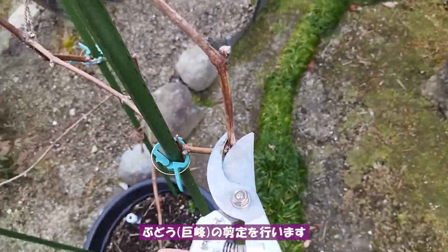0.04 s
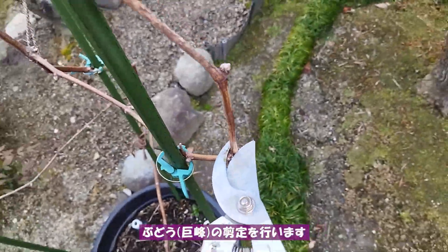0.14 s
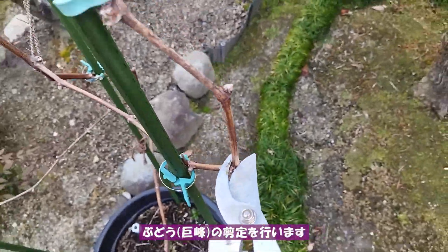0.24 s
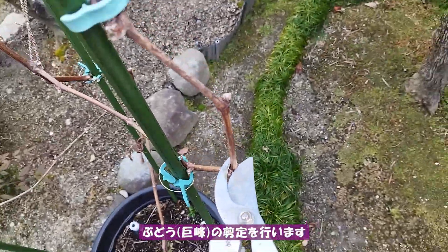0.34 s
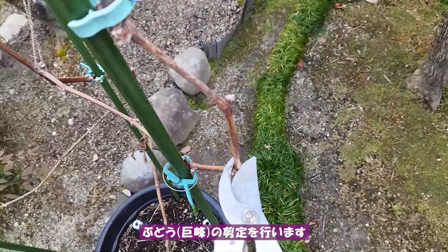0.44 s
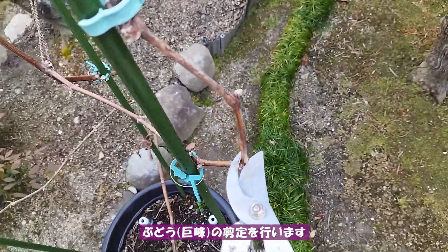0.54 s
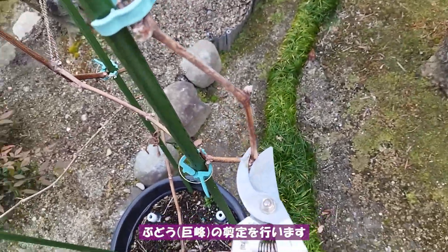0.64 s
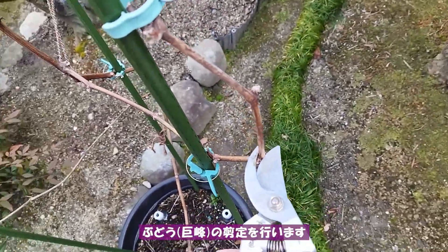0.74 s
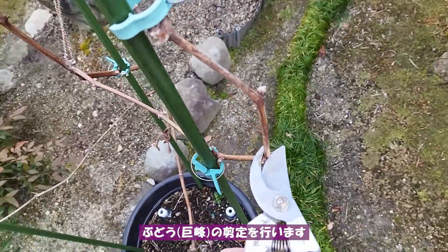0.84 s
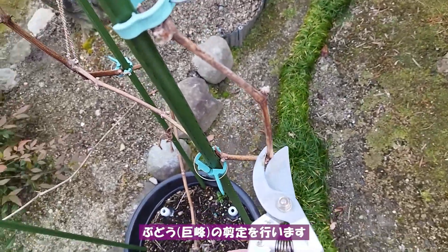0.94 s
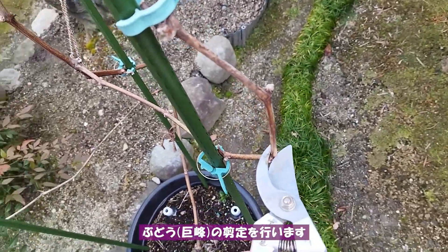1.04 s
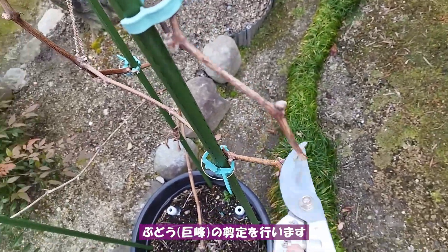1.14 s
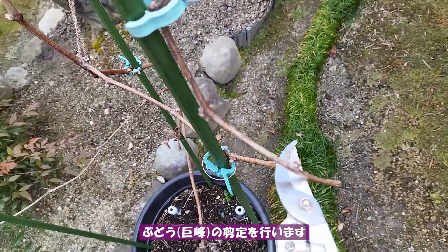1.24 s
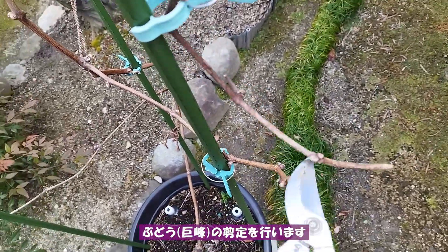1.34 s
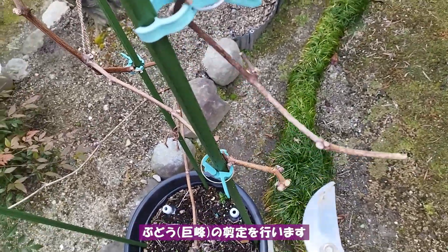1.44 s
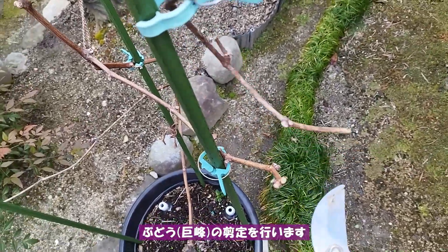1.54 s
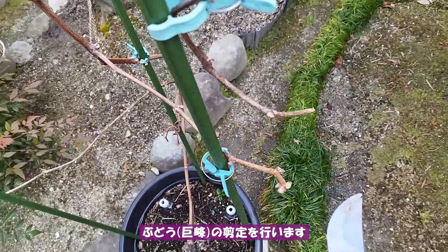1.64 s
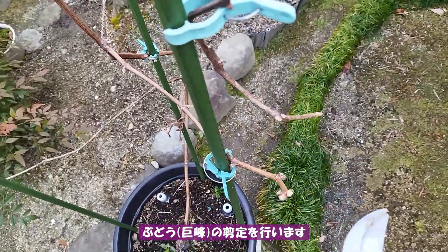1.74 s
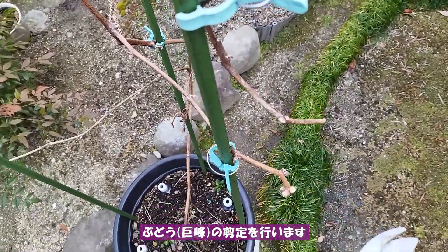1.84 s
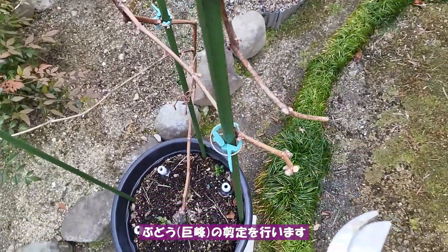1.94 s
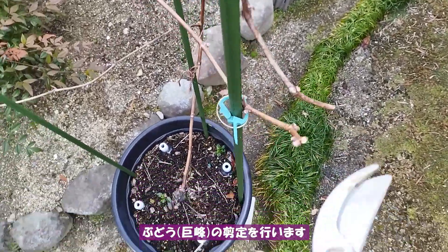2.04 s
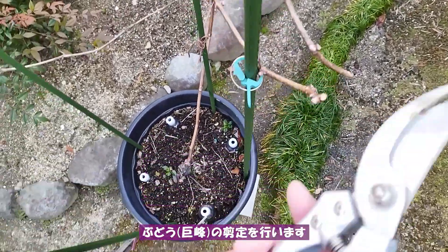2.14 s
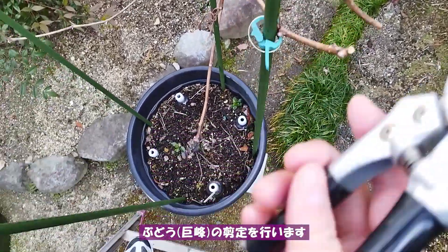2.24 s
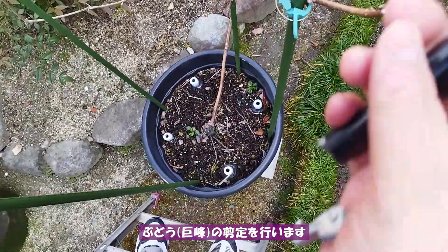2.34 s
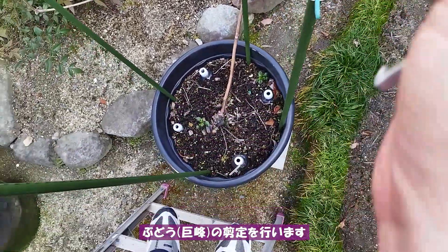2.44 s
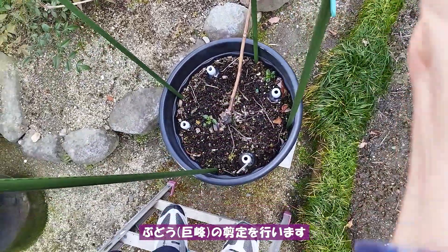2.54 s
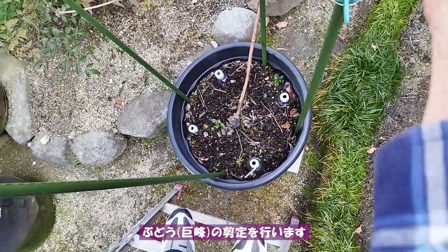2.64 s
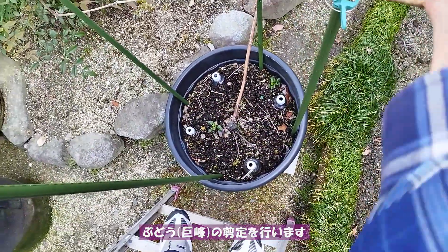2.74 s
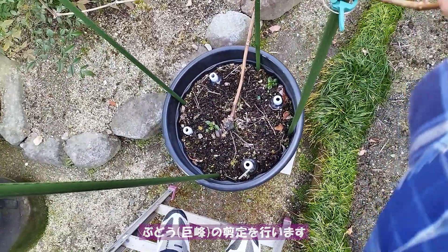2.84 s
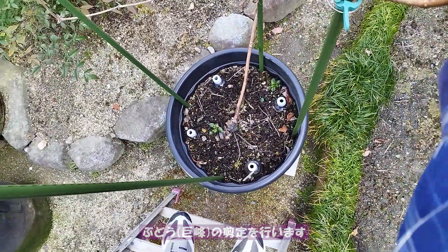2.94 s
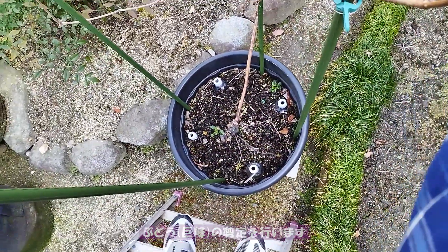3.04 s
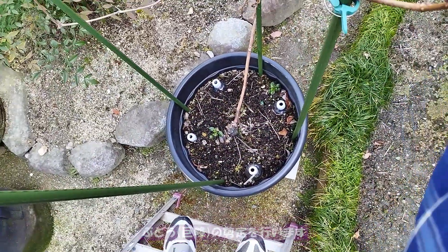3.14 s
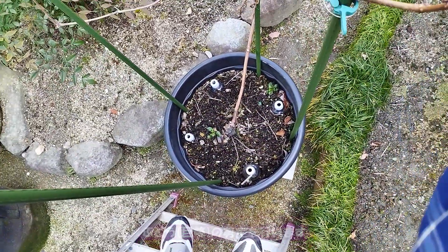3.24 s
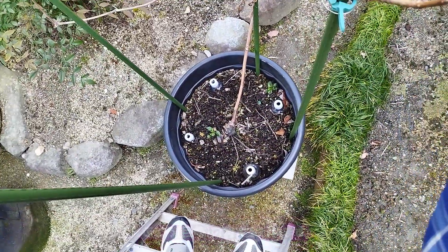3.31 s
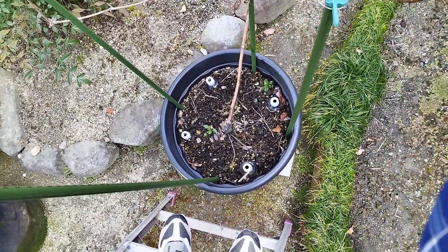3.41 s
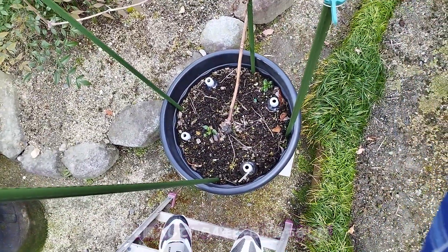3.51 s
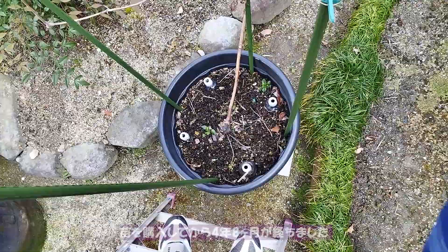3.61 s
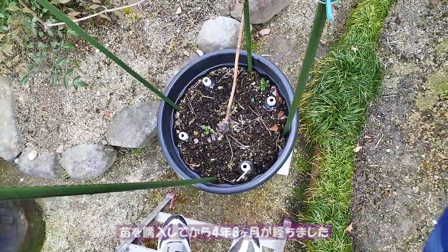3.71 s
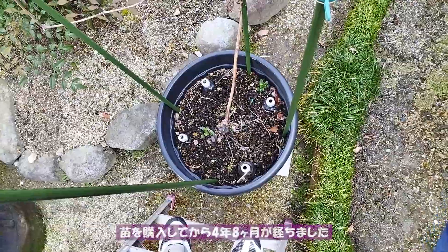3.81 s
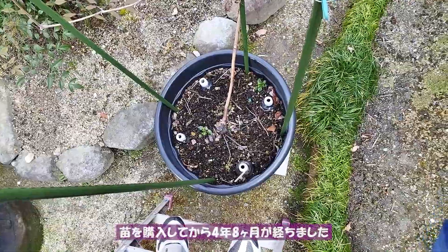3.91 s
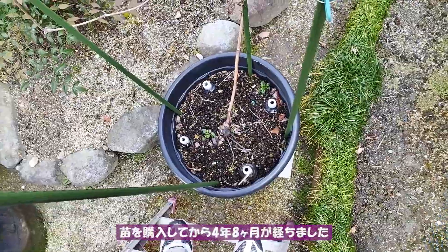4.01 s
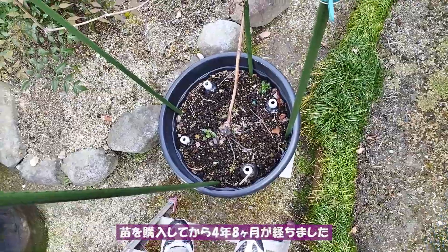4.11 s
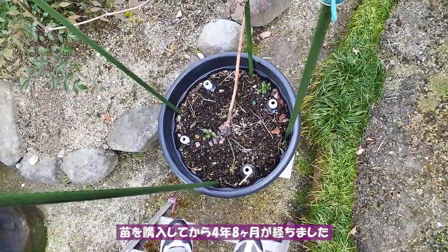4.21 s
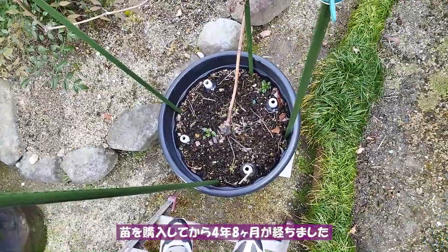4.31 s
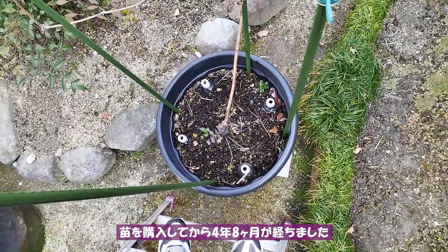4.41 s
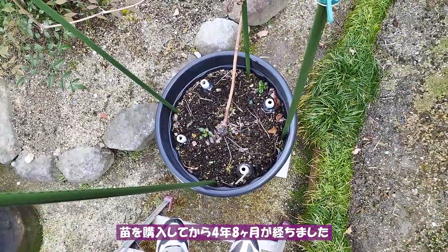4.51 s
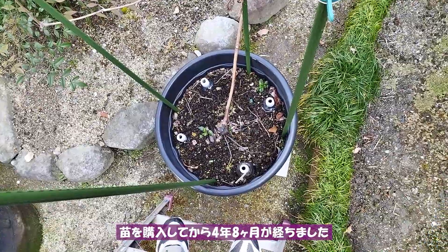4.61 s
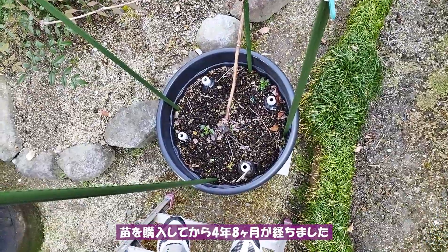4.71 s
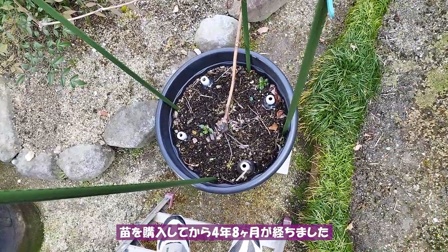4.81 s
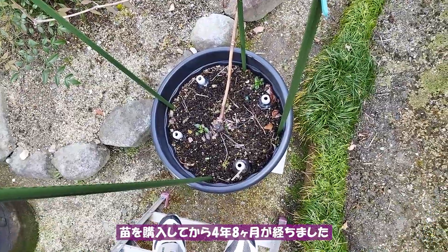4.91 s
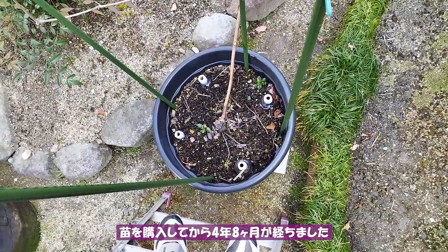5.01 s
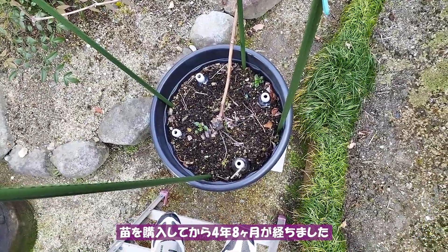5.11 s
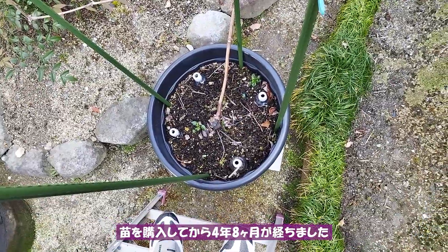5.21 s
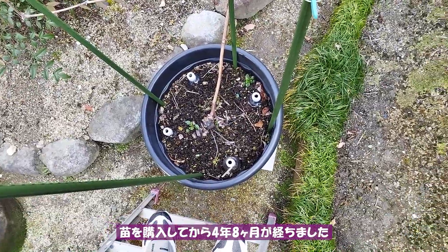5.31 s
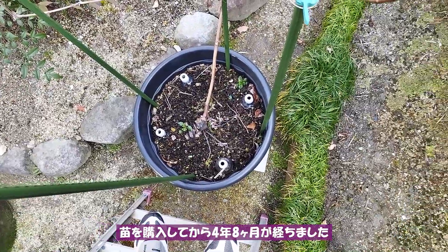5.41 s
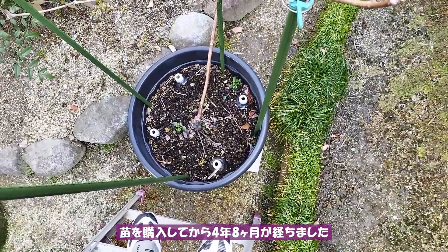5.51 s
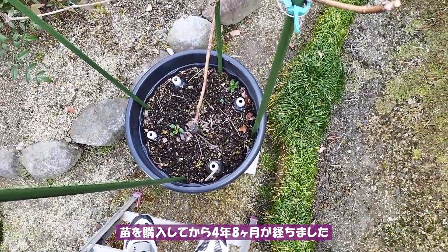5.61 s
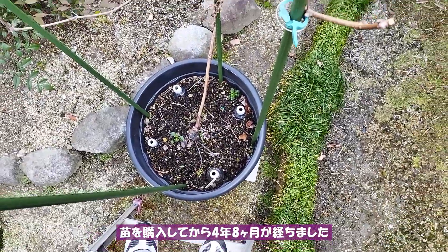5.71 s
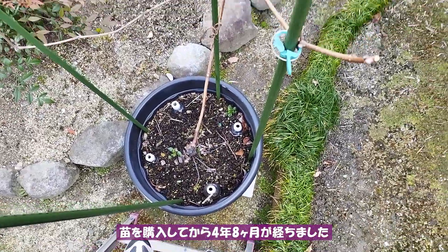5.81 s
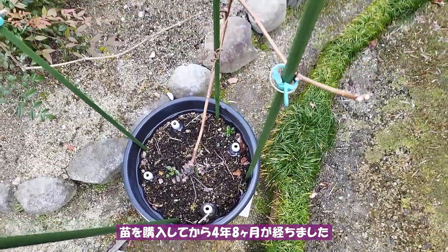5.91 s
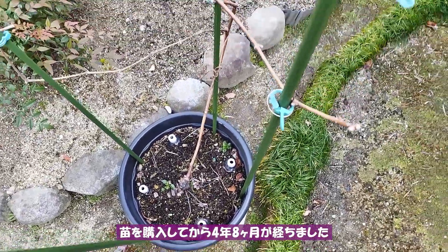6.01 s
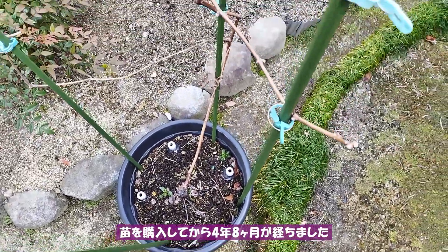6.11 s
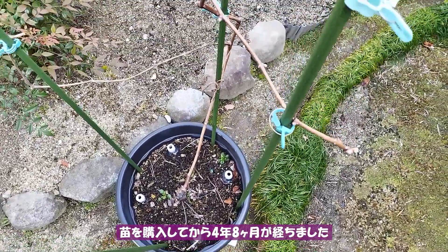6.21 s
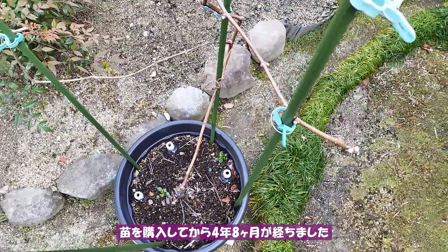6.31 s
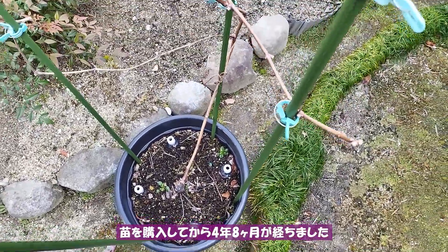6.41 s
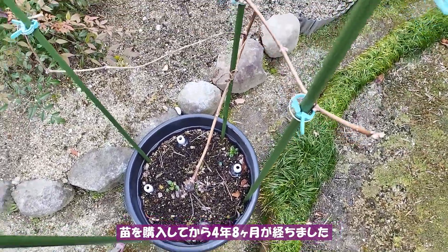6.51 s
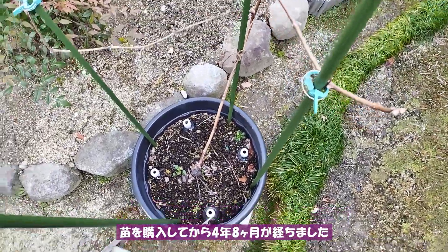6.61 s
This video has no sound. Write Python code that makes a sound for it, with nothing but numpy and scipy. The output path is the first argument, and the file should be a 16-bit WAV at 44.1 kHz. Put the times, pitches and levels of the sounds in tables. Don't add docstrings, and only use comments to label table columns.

```python
import sys
import numpy as np
from scipy import signal
from scipy.fft import rfft, irfft, next_fast_len
from scipy.io import wavfile
from scipy.ndimage import uniform_filter1d

SR = 44100
rng = np.random.default_rng(int(sys.argv[2]) if len(sys.argv) > 2 else 0)


def store_wav(level_fs):
    pcm = np.round(np.clip(np.atleast_2d(level_fs), -1, 1) * 32767)
    wavfile.write(sys.argv[1], SR, pcm.T.astype(np.int16))


def invert_db(level):
    return 10 ** (np.asarray(level, dtype=float) / 20)


N = 293529
CUT_LAG, LAG, HAND_DROP_S = 10, 13, 2.5


def evened(x):
    return x / np.sqrt(np.mean(x ** 2) + 1e-20)


def read(points, hz):
    f, value = np.transpose(points)
    return np.interp(np.log(hz + 1), np.log(f + 1), value)


def column(rows, index, t):
    return np.interp(t, np.array(rows)[:, 0], np.array(rows)[:, index])


def hiss(shape_db, same, size):
    hop = size // 4
    frames, hz = N // hop + 5, np.fft.rfftfreq(size, 1 / SR)
    a, b, c, d = rng.standard_normal((frames, len(hz), 4)).T
    same = np.clip(same(hz), -1, 1)[:, None]
    left, other = a + 1j * b, c + 1j * d
    z = np.array([left, same * left + np.sqrt(1 - same ** 2) * other])
    z *= invert_db(shape_db(hz[:, None], np.arange(frames) * hop / SR))
    return signal.istft(z, nperseg=size, noverlap=size - hop)[1][:, :N]


# frequency in Hz, density in dB per Hz.
AIR_SPECTRUM = [(15, -28.5), (25, -5.5), (60, -4.5), (108, -13.5), (146, -14.5), (182, -19), (259, -15),
                (422, -21), (524, -18), (1120, -23.5), (1600, -26.5), (3510, -41), (7400, -51), (8300, -58),
                (10500, -53.5), (14800, -44), (16500, -58)]
# frequency in Hz, left-right likeness from -1 to 1.
PORT_LIKENESS = [(60, 0.89), (150, 0.88), (380, 0.71), (950, -0.19), (2380, -0.14), (5980, 0.02),
                 (15000, -0.45)]


def air():
    wash = hiss(lambda hz, t: read(AIR_SPECTRUM, hz) + 0 * t, lambda hz: read(PORT_LIKENESS, hz), size=2048)
    return invert_db(-53.5) * evened(wash)


# time in seconds, level in dB.
TRAFFIC = [(0.0, -56), (0.35, -64.5), (1.0, -60), (1.3, -53.5), (1.7, -53.5), (2.2, -56), (2.9, -60),
           (3.5, -53), (4.04, -51), (4.46, -54.5), (4.85, -58), (5.24, -52.5), (5.6, -56), (6.2, -58.5),
           (6.66, -55.5)]
# centre in seconds, width in seconds, rise in dB.
GUSTS = [
    (0.05, 0.35, 13),
    (0.42, 0.032, 21),
    (1.2, 0.14, 11),
    (1.5, 0.11, 6),
    (3.4, 0.23, 6),
    (5.6, 0.056, 8.1),
    (6.4, 0.097, 5.3),
]


def rumble():
    t = np.arange(N) / SR
    drone_spectrum = [(70, -29.5), (120, 3.5), (290, 0.5), (400, -12.5), (700, -47.0)]
    wind_spectrum = [(12, -11), (25, -4.5), (60, -2.5), (100, -31)]
    drone = hiss(lambda hz, t: read(drone_spectrum, hz) + 0 * t, lambda hz: .93 + 0 * hz, size=2048)
    wind = hiss(lambda hz, t: read(wind_spectrum, hz) - hz / 10 + 0 * t, lambda hz: .55 + 0 * hz, size=4096)
    wind_db = -59.5 + sum(db * np.exp(-((t - s) / width) ** 2) for s, width, db in GUSTS)
    return invert_db(column(TRAFFIC, 1, t) - 2.0) * evened(drone) + invert_db(wind_db - 6) * evened(wind)


def ringing(modes, size=2048):
    t = np.arange(size) / SR
    h = 0
    for hz, width, db in modes:
        decay = np.exp(-np.pi * width * t)
        h = h + invert_db(db) * np.sqrt(width) * decay * np.sin(2 * np.pi * hz * t)
    return h / np.linalg.norm(h)


def steep(h, low_hz, high_hz):
    return signal.sosfilt(signal.butter(2, [low_hz, high_hz], "band", fs=SR, output="sos"), h)


# frequency in Hz, width in Hz, level in dB.
BODY_MODES = [(1750, 400, 2), (2050, 350, 4), (2600, 450, 9), (3255, 1200, 3)]
MIDDLE_MODES = [(6000, 1700, -9), (6820, 1200, -3), (7000, 2280, -2.5)]
TREBLE_MODES = [(9880, 1000, -12), (12500, 2200, -2.5), (14190, 2000, 3.5)]


def voices():
    body = steep(ringing(BODY_MODES), 1100, 3800)
    middle = steep(ringing(MIDDLE_MODES), 4600, 9000)
    return [body, middle, steep(ringing(TREBLE_MODES), 8000, 16500)]


def part(hz, spread, upper_db=-6):
    modes = [(0.9 * hz, spread * hz, -6), (hz, spread * hz, 0), (1.25 * hz, 2 * spread * hz, upper_db)]
    return steep(ringing(modes), 0.75 * hz, min(1.8 * hz, .45 * SR))


def grains(size):
    strength_db = 2.0 * np.minimum(rng.exponential(1, size), 5)
    g = rng.standard_normal((3, size)) * invert_db(strength_db)
    return evened(g[:2] + 0.34 * np.array([np.roll(g[2], LAG), g[2]]))


# frequency in Hz, width in Hz, level in dB.
CRACK_MODES = [(3328, 350, -4), (4170, 890, -2), (4740, 850, 1), (5800, 160, -9), (6430, 650, -5),
               (7460, 910, -24)]
# time in seconds, effort in dB, brightness in dB.
HAND_MOTION = [(0.0, -86, 1), (0.9, -78.5, -9), (1.1, -75, -8.5), (1.42, -63, -11.5), (1.6, -89, -5.5),
               (2.0, -80, -6), (2.3, -73, -3.5), (2.78, -66, -4.5), (2.95, -76.5, -1.5), (3.5, -77.5, 1.5),
               (3.85, -68, -11), (4.25, -72, -0.5), (4.55, -74, -2.5), (5.0, -67.5, -2), (5.12, -86, 0.5),
               (5.54, -64, -20.5), (5.8, -68, -6), (6.66, -68.5, -8.5)]


def rustle():
    t = np.arange(N) / SR
    effort, bright = column(HAND_MOTION, 1, t), column(HAND_MOTION, 2, t)
    after = np.maximum(t - 1.185, 0)
    bed = 0
    groups = zip(voices(), [0, 1, 1.25], [-69, -51, -52], [-40, -150, -140])
    for h, share, db, fall in groups:
        level = invert_db(effort + share * bright) + invert_db(db + fall * after) * (after > 0)
        rasp = grains(N)
        bed = bed + signal.oaconvolve(level * rasp, h[None])[:, :N]
    crackle = invert_db(-47.5 - 150 * after) * (after > 0) * rasp
    fibres = steep(ringing(CRACK_MODES[:3]), 2700, 5500)
    return bed + signal.oaconvolve(crackle, fibres[None])[:, :N]


# start in seconds, length in seconds, level in dB.
SQUEAKS = [
    (4.495, 0.074, -54),
    (4.56, 0.036, -58),
    (4.74, 0.066, -59),
    (4.8, 0.12, -61),
    (4.95, 0.08, -56),
    (5.061, 0.046, -45.5),
]


def spring_squeak():
    t, hz = np.arange(N) / SR, 3160
    squeak = evened(signal.oaconvolve(rng.standard_normal(N), ringing([(hz, 60, 0)]))[:N])
    squeak += invert_db(-3.5) * np.sin(2 * np.pi * hz * t + 4.4 * np.sin(2 * np.pi * 7 * t))
    level = 0
    for s, length, db in SQUEAKS:
        level = level + invert_db(db - 10.0) * np.clip(np.minimum(t - s, s + length - t) / 0.017, 0, 1)
    squeak *= level
    return np.array([np.roll(squeak, LAG), squeak])


def add(mix, s, sound):
    mix[:, round(s * SR):][:, :sound.shape[1]] += sound


# start and length in seconds, level in dB, body pitch in Hz.
BRUSHES = [(0.035, 0.035, -70, 2480), (1.128, 0.019, -59, 2300), (1.308, 0.034, -54.5, 1230),
           (1.564, 0.056, -69, 2510), (1.62, 0.072, -60, 2690), (1.849, 0.046, -64, 2600),
           (1.957, 0.083, -74.5, 2480), (3.077, 0.033, -69.5, 2800), (3.128, 0.064, -60.5, 2720),
           (3.365, 0.025, -69, 2600), (3.843, 0.033, -63.5, 2337), (4.013, 0.086, -66, 2960),
           (4.08, 0.12, -67, 2940), (4.439, 0.05, -70, 2470), (4.484, 0.13, -64, 2920),
           (4.76, 0.18, -67.5, 2900), (4.9, 0.11, -59.5, 2750), (5.019, 0.097, -58.5, 2910),
           (5.37, 0.052, -67, 2360), (5.638, 0.038, -70, 2390)]
# start and length in seconds, level in dB, body pitch in Hz.
SCUFFS = [(1.753, 0.014, -54, 2600), (1.798, 0.06, -51, 2680), (1.8, 0.04, -58, 3200),
          (1.805, 0.05, -57, 1980), (1.803, .025, -61, 6740), (1.815, 0.013, -51, 2500),
          (1.83, 0.0066, -54, 6660), (3.459, 0.021, -61, 2330), (3.696, 0.023, -66, 2820),
          (3.8, 0.16, -61, 1920), (3.82, 0.14, -61, 2490), (3.84, 0.043, -61.5, 2200),
          (4.05, 0.14, -68, 1990), (4.11, 0.067, -65.5, 7700), (4.618, 0.045, -62, 2200),
          (4.49, .11, -62, 2500), (4.76, .15, -65, 2300), (4.9, 0.27, -62, 2200), (6.085, 0.05, -55, 2450),
          (6.092, 0.011, -52, 2050)]


def rubs():
    out = np.zeros((2, N))
    flutter = invert_db(1.8 * evened(uniform_filter1d(rng.standard_normal(N), size=200)))
    rasp = np.array([grains(N) for _ in range(3)]) * flutter
    upper = voices()[1:]
    for strokes, colour_db, pan_db in [(BRUSHES, [-2, -1, 0], 0), (SCUFFS, [-1, -27, -19], 7)]:
        pan = invert_db(pan_db * np.array([[.5], [-.5]]))
        for s, length, db, hz in strokes:
            at = round(s * SR)
            stroke = signal.windows.tukey(round(length * SR), .6)
            level = invert_db(db + np.array(colour_db))[:, None, None] * pan
            drive = level * stroke * rasp[:, :, at:at + len(stroke)]
            responses = np.array([part(hz, 0.079, upper_db=-15), *upper])[:, None]
            add(out, s, signal.fftconvolve(drive, responses, axes=2).sum(0))
    return out


def scrape(ms, noise, drag_db):
    t = np.arange(noise.shape[-1]) / SR
    onset = 1 - np.exp(-t / .0001)
    shape = onset * (np.exp(-t / (max(ms, .1) / 1000)) + invert_db(drag_db) * np.exp(-t / 0.011))
    both = shape * (noise[:, :1] + .65 * noise[:, 1:])
    return both / np.linalg.norm(both, axis=2, keepdims=True)


# time in seconds, edge in dB,
# middle in dB, body in dB, body pitch in Hz.
CLICKS = [(0.9633, -32.5, -58, -39.5, 2230), (0.9843, -40, -47, -59, 4120), (0.9916, -40, -46, -65, 1260),
          (1.053, -35.5, -43.5, -45, 2290), (1.1153, -38, -44, -43.5, 2600), (1.315, -36, -43, -42, 1150),
          (3.1347, -47, -53, -64, 2600), (3.1984, -52, -66, -69, 1140), (3.2237, -43, -56, -72, 2270),
          (3.231, -29, -35.5, -54, 2290), (3.4074, -55.5, -66, -70, 1860), (4.0427, -53, -55, -59, 2380),
          (4.2589, -27.5, -37, -36, 3380), (4.2592, -49.5, -60, -38, 7960),
          (4.698, -47.5, -59.5, -67.5, 1370), (4.7457, -31, -36.5, -44, 3130),
          (4.7578, -36, -46, -64, 3240), (4.7635, -41, -51, -60, 3160), (4.775, -40, -50, -63, 3120),
          (5.019, -53, -56, -55, 5000), (6.145, -55, -68, -66, 1750)]
# time in seconds, edge in dB, middle in dB,
# body in dB, body pitch in Hz.
TWIGS = [(0.6911, -58, -58.5, -57.5, 3830), (1.262, -58, -62, -61, 2480), (1.2986, -42, -50, -50, 2840),
         (1.3256, -41, -43, -36.5, 1630), (1.3544, -51, -51, -48, 1310), (1.3664, -50, -49, -46, 1170),
         (1.3874, -43, -42, -43.5, 2560), (1.4018, -51, -53, -51, 1407), (1.453, -60, -54, -55.5, 3630),
         (1.8333, -55, -47, -49, 2600), (3.2363, -27, -34, -54.5, 2600), (3.2436, -44, -45, -51, 2600),
         (3.2485, -33, -36, -48.5, 2084), (3.7578, -51, -51, -51, 2035), (3.9516, -47.5, -45, -44.5, 3080),
         (4.003, -58, -49.5, -51, 2990), (4.0257, -48, -56, -62, 2910), (4.5088, -61, -51.5, -61, 3160),
         (4.9048, -54, -48.5, -46.5, 2660), (5.046, -57, -56, -48, 1580), (5.3954, -57.5, -58.5, -66, 2345),
         (5.8643, -53, -56, -41.5, 1100), (5.8749, -34, -41, -33.5, 3330), (5.8786, -44, -35, -57.5, 2160),
         (5.905, -46, -49, -60, 2230)]
# time in seconds, body in
# dB, left over right in dB, body pitch in Hz.
TAPS = [(0.9636, -47, 11, 1880), (0.9638, -46, 5, 4300), (1.117, -48, 11, 2100), (1.315, -45, 8, 4050),
        (2.954, -54, 10, 2070), (3.1343, -42, 7.5, 2150), (3.237, -53, 4, 3300), (3.25, -50, 7, 2050),
        (3.558, -56, 2, 2200), (3.586, -58, 1, 3140), (3.8072, -52, 8, 2050), (3.8075, -50, 0, 300),
        (4.2591, -45, 5, 2100), (4.631, -56, 8, 2040), (4.7455, -53, 7, 1900), (5.352, -60, 3, 3000),
        (5.6525, -60, 0, 7500), (5.7665, -57, 3, 4500), (5.7667, -60, 3, 13500), (5.8281, -59, 10, 2440),
        (5.8747, -41, 11, 1850), (5.875, -47.5, 3, 750), (5.879, -40, 10, 14400), (6.098, -49, 6, 2400),
        (6.1124, -50, 9, 14200), (6.2768, -55, 6, 14100)]


def ticks():
    rows = []  # s, body, edge and middle dB, body and edge pan dB, pitch Hz, ring width over pitch
    for s, edge, middle, body, hz in CLICKS:
        edge_pan = -4 if s > HAND_DROP_S else 5.5
        rows.append((s, body, edge, middle, 5, edge_pan, hz, 0.31))
    for s, edge, middle, body, hz in TWIGS:
        rows.append((s, body, edge, middle, 5, 1.5, hz, 0.5))
    for s, body, pan, hz in TAPS:
        rows.append((s, body, body - 23, body - 23, pan, pan, hz, .1))
    noise = rng.standard_normal((len(rows), 3, 3, 800))
    noise[:, 0, 0, 5] += 14
    out, upper = np.zeros((2, N)), voices()[1:]
    for (s, body_db, treble_db, middle_db, pan_db, edge_pan_db, hz, spread), n in zip(rows, noise):
        level = invert_db(np.array([body_db + 21.0, middle_db + 16.5, treble_db + 16.5]))[:, None, None]
        pan = np.clip([pan_db, edge_pan_db, edge_pan_db], -9, 11)[:, None, None]
        drive = level * invert_db(pan * [[.5], [-.5]]) * scrape(.5, n, drag_db=-30.5)
        responses = np.array([part(hz, spread), *upper])[:, None]
        add(out, s, signal.fftconvolve(drive, responses, axes=2).sum(0))
    return out


# frequency in Hz, level in dB, t60 in seconds.
STEEL_MODES = [(2040, -9.5, 0.2), (2480, -0.5, 0.067), (2680, 1, 0.083), (2800, -5.5, .12),
               (4260, -8, 0.14), (4450, -8.5, .04), (4553, -8, .04), (5050, -18.5, .08), (5717, -15, .09),
               (6340, -18, .1), (6800, -13, 0.087), (6540, -8, 0.045), (6840, -12.5, .065)]
# time in seconds, level in dB.
BLADE_BLOWS = [
    (1.1604, -36),
    (1.1732, -15),
    (1.1755, -19),
    (1.1792, -20),
    (1.189, -32),
]


def blades():
    out = np.zeros((2, N))
    ring = ringing([(hz, 2.2 / t60, db) for hz, db, t60 in STEEL_MODES], size=8192)
    for s, db in BLADE_BLOWS:
        add(out, s, invert_db(db + 21.0 + np.array([[0], [-6.5]])) * ring)
    return out


# time in seconds, blow in dB, treble in dB,
# middle in dB, scrape length in ms.
SNAPS = [(1.13, -45, -45, -53.5, 1.54), (1.134, -38.5, -50.5, -54, 1.5), (1.1395, -52.5, -43, -57.5, 1.),
         (1.1468, -34.5, -37.5, -38.5, 1.5), (1.1488, -11, -15, -23, 0.7), (1.153, -23, -27.5, -33, .6),
         (1.1558, -30, -28, -32, 1.8), (1.1603, -9, -16, -15.5, .9), (1.1632, -25, -24, -28, .7),
         (1.1679, -29, -28.5, -30, 2.2), (1.1713, -20, -22.5, -24.5, 1.), (1.173, -15.5, -17.5, -22, 1.),
         (1.1742, -18.5, -22, -19, 1.), (1.1763, -18.5, -23.5, -22, .8), (1.1786, -21.5, -27.5, -22, .8),
         (1.1791, -12, -24.5, -12, .7), (1.1867, -25.5, -39, -32.5, 1.2), (1.1958, -34.5, -40.5, -41, 0.88)]


def snip():
    noise = rng.standard_normal((len(SNAPS), 3, 3, 800))
    noise[:, 0, 0, 2:8] += 10 * np.hanning(6)
    drive = np.zeros((3, 2, N))
    for (s, body_db, treble_db, middle_db, ms), n in zip(SNAPS, noise):
        at = round(s * SR)
        level = invert_db(np.array([body_db + 13, middle_db + 24.5, treble_db + 21.5]))[:, None, None]
        drive[:, :, at:at + n.shape[-1]] += level * scrape(ms, n, drag_db=-22)
    thud = ringing([(128.4, 66, -13.0), (258.8, 200, 0.5), (500, 500, 4.0), (764, 230, 3), (1170, 41, -6.5)])
    body, _, treble = voices()
    body = invert_db(np.array([[0.], [-6.5]])) * body + invert_db(-16.0) * thud
    crack = invert_db(np.array([[1.], [-1.]])) * steep(ringing(CRACK_MODES), 3400, 10000)
    treble = invert_db(np.array([[1.5], [-1.5]])) * treble
    groups = [body, crack, treble]
    return sum(signal.oaconvolve(d, h, axes=1)[:, :N] for d, h in zip(drive, groups))


# frequency in Hz, t60 in seconds.
GARDEN_DECAY = [(200, 0.12), (1000, 0.28), (2500, 0.29), (6000, 0.026), (14000, 0.11)]


def garden(x):
    taps = np.zeros((2, SR // 2))
    at = np.arange(60, SR // 2 - 20, 20) + rng.integers(0, 20, (2, (SR // 2 - 61) // 20))
    np.put_along_axis(taps, at, rng.choice([-1., 1.], at.shape), 1)
    hz, t, z = signal.stft(taps, SR, nperseg=128)
    far = invert_db(-60 * t / read(GARDEN_DECAY, hz)[:, None])
    close = 5.3 * invert_db(-60 * t / 0.044)
    tail = signal.istft(z * (far + close), SR, nperseg=128)[1]
    return signal.fftconvolve(x, tail / np.linalg.norm(tail[0]), axes=1)[:, :N]


# frequency in Hz, gain in dB.
LEFT_CAVITY = [(700, 0.5), (1200, -0.5), (1900, 4.5), (2600, 6), (3400, 2), (4400, -1.5), (9000, -0.5),
               (14000, 1.5)]


def ports(x, depth):
    size = next_fast_len(N)
    lift = invert_db(depth * read(LEFT_CAVITY, np.fft.rfftfreq(size, 1 / SR)))
    left = irfft(rfft(x[0], size) * lift, size)[:N]
    before_drop = np.arange(N) < HAND_DROP_S * SR
    return np.array([np.where(before_drop, np.roll(left, CUT_LAG), np.roll(left, LAG)), x[1]])


def scene():
    background = air() + rumble()
    hands = rustle() + spring_squeak() + rubs()
    small, snap = ticks(), snip() + blades()
    small = ports(small + invert_db(-7.5) * garden(small), depth=0.37)
    cut = ports(snap + invert_db(-16.0) * garden(snap), depth=1)
    return background + hands + small + cut


def top_cut(x):
    return signal.sosfilt(signal.butter(12, 17010, fs=SR, output="sos"), x)


def record(dry):
    soft = .95 * np.tanh(dry / .95)
    lowpass = signal.firwin(511, 15800, window=("kaiser", 8), fs=SR)
    low = signal.oaconvolve(soft, lowpass[None], "same")
    return top_cut(low + invert_db(-32.5) * (soft - low))


dry = scene()
out = record(dry)
store_wav(out)
```